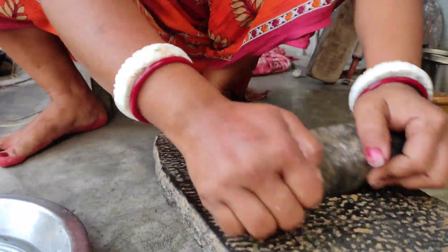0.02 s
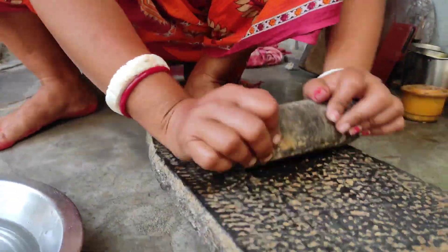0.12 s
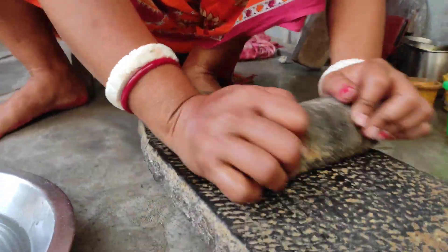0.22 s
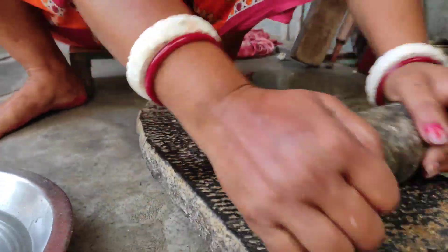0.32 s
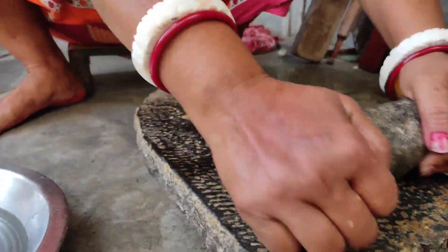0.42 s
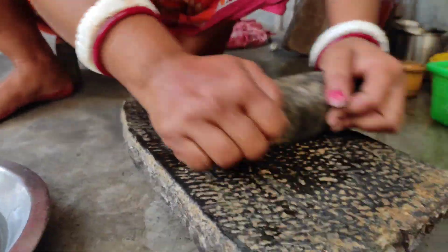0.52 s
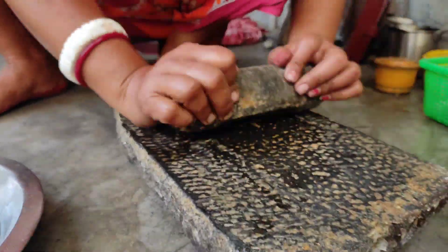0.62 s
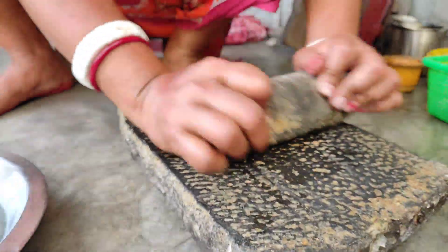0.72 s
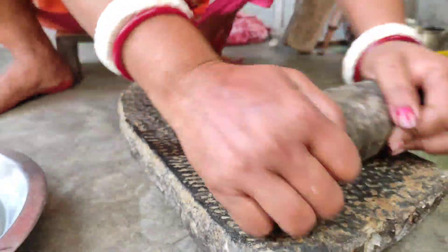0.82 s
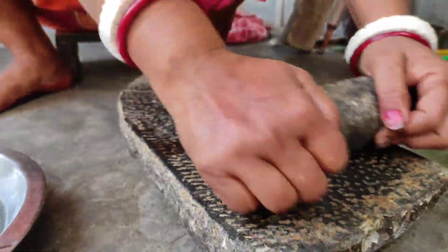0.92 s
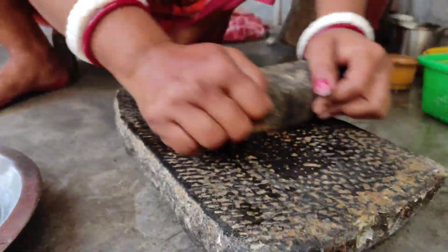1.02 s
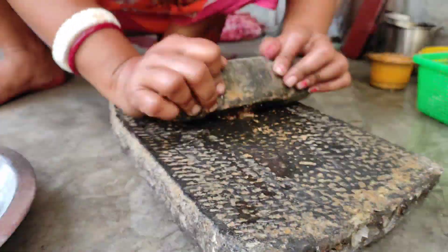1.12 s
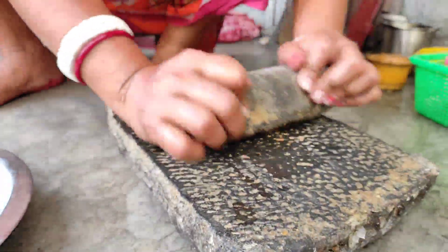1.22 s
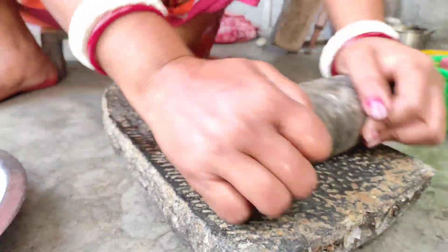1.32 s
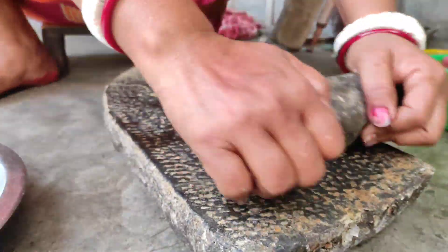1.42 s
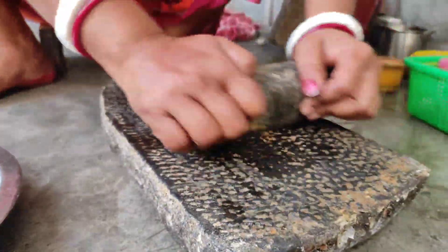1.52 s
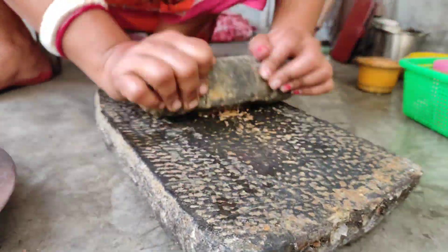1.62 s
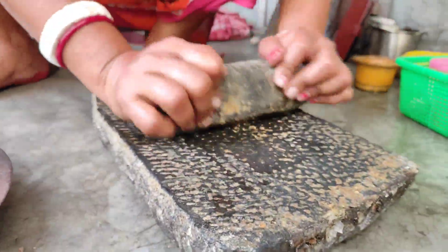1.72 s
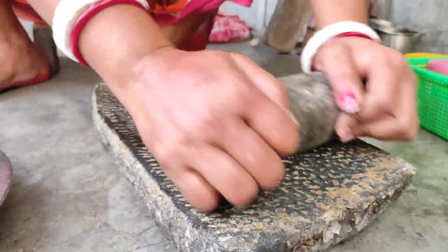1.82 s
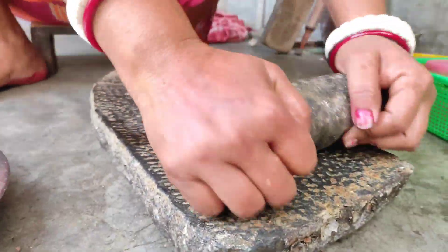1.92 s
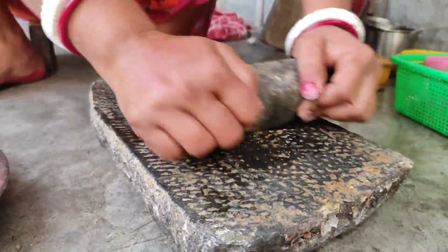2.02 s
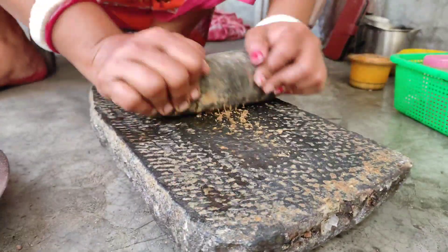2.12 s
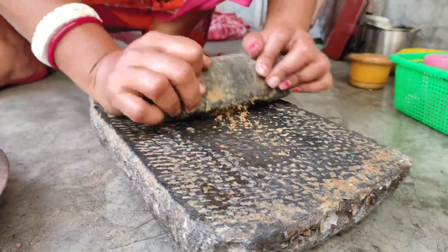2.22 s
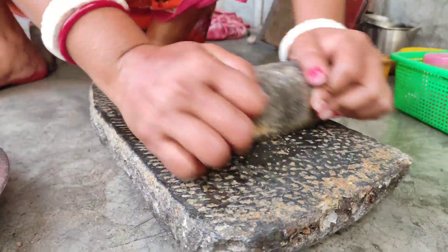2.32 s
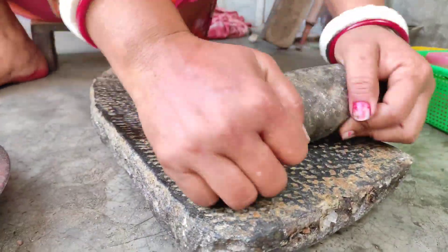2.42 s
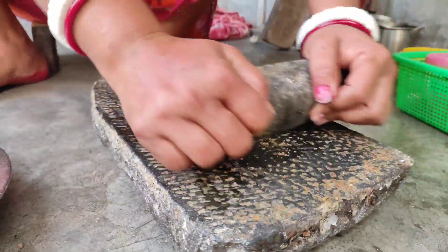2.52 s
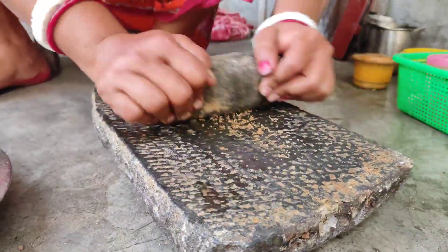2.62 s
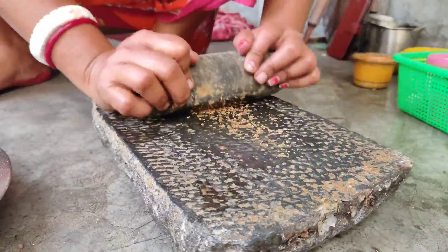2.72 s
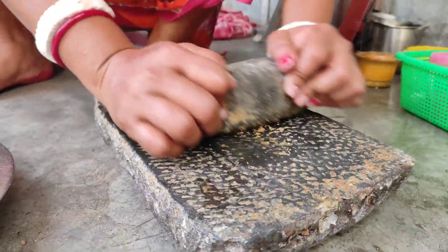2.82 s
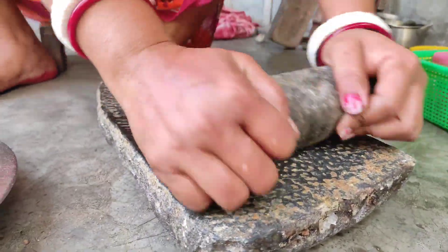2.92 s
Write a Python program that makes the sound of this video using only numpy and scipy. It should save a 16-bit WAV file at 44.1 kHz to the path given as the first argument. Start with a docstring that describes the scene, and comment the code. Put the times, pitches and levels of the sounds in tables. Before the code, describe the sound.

Stone roller knocking and scraping on a pitted stone slab, heard close in a small hard room. Soft quick knocks build from 0.05 to 0.27 s; loud, dry, hollow rattles follow around 0.4-0.5, 0.65-0.75, 0.95, 1.45, 1.7 and 2.0 s, then lighter ones at 2.2, 2.55 and 2.75. Gritty hisses swell near 0.9, 1.4, 1.9, 2.4 and 2.95 s, with seed cracks, a faint moan at 1.25 and low floor grumble.

```python
"""Soft knocks of stone on stone come first, over faint room noise, and soon grow into loud rattling bursts.
A stone roller pushed to and fro over a pitted slab on a hard floor: knocks and pit bumps drive the slab's
dull modes, and the harder contacts add dry cracks and a crunchy rasp. Flickering grains and noise make the
grit hiss of sliding, with seeds cracking, a narrow hum and a brief moan; low grumbles come through the floor."""
import sys
import numpy as np
from scipy import signal
from scipy.fft import rfft, irfft
from scipy.io import wavfile
from scipy.ndimage import uniform_filter1d

SR = 44100
rng = np.random.default_rng(int(sys.argv[2]) if len(sys.argv) > 2 else 0)


def unload_wav(signal):
    """Save mono or channel-first audio to the path in sys.argv[1] as 16-bit WAV at rate SR, clipped to [-1, 1]."""
    wavfile.write(
        sys.argv[1],
        SR,
        np.round(np.clip(np.atleast_2d(signal).T, -1, 1) * 32767).astype(np.int16),
    )


N = 132300

# Steady room noise, relative spectrum: pitch_hz [Hz], density_db [dB per Hz]
AIR_SPECTRUM = [(12, -24), (20, 13), (161, -1), (526, -19), (711, -46.5), (839, 14.5), (1200, -13),
                (1670, 9), (2590, -12.5), (4000, -12), (5800, -7.5), (8200, -25.5), (11700, -41),
                (14200, -40), (15600, -75)]
AIR_DB = -51
# Grumble through the floor: time_s [s], level_db [dB]
RUMBLE_LEVEL = [(0.0, -56), (0.04, -69), (0.3, -49.5), (0.34, -49), (0.4, -43.5), (0.53, -49), (0.59, -61),
                (0.66, -47), (0.85, -51.5), (0.96, -37), (1.1, -54.5), (1.19, -50.5), (1.29, -52),
                (1.33, -56), (1.46, -40.5), (1.53, -45), (1.56, -54), (1.65, -58.5), (1.7, -43.5),
                (1.85, -58), (1.98, -35.5), (2.15, -60), (2.21, -48), (2.33, -48.5), (2.37, -66),
                (2.41, -48), (2.51, -40.5), (2.58, -43), (2.65, -72), (2.7, -51), (2.73, -41), (2.91, -59),
                (2.97, -42), (3.0, -47.5)]
# Relative spectrum of the grumble: pitch_hz [Hz], density_db [dB per Hz]
RUMBLE_SPECTRUM = [(50, -35), (100, -3.5), (200, 1.5), (400, 3.5), (650, 2), (1200, -33)]
# Brief low moans while sliding: start_s [s], length_s [s], starting pitch_hz [Hz], level_db [dB]
MOAN_EVENTS = [(1.229, 0.098, 224, -46.5)]

# Hiss of the sliding roller, before flicker and patches: time_s [s], level_db [dB]
SLIDE_LEVEL = [(0.0, -66.5), (0.22, -54), (0.29, -71), (0.31, -35), (0.34, -54), (0.35, -38.5), (0.39, -51),
               (0.53, -54), (0.54, -34.5), (0.55, -58), (0.59, -65.5), (0.71, -54.5), (0.78, -63),
               (0.8, -40), (0.84, -46.5), (0.88, -33), (0.9, -42), (0.94, -44.5), (1.01, -68), (1.02, -51),
               (1.09, -73), (1.17, -57), (1.28, -57.5), (1.29, -45.5), (1.37, -38.5), (1.39, -27),
               (1.5, -50), (1.54, -60), (1.57, -65), (1.72, -55), (1.79, -37.5), (1.86, -48.5), (1.88, -33),
               (1.91, -29.5), (1.98, -37.5), (2.0, -62), (2.03, -40), (2.05, -58), (2.1, -76), (2.2, -59.5),
               (2.31, -37.5), (2.39, -47), (2.41, -30.5), (2.46, -32.5), (2.51, -37.5), (2.62, -69),
               (2.73, -58), (2.83, -32.5), (2.92, -50.5), (2.95, -31), (2.97, -31), (3.0, -36.5)]
# Relative spectrum of the hiss: pitch_hz [Hz], density_db [dB per Hz]
HISS_SPECTRUM = [(1060, -63), (1800, -12), (2140, -15), (2920, -6.5), (3880, -1), (4620, -3.5), (7170, -5),
                 (9540, -5.5), (13000, -0.5), (14200, -4.5), (14450, -41), (15600, -59)]
# Broad resonances of the grit: pitch_hz [Hz], width_hz [Hz], relative level_db [dB]
GRIT_RESONANCES = [(7070, 630, -1), (5650, 2600, -4.5)]
# Seeds cracking, as sudden lifts of the hiss: start_s [s], relative level_db [dB]
SEED_CRACKS = [(0.537, -27.5), (1.0183, -31.5), (1.284, -32), (1.5184, -22), (1.88, -30.5), (2.0254, -25.5),
               (2.412, -14.5), (2.4241, -28), (2.4655, -25), (2.4913, -12)]
SEED_DECAY_S = 0.002
GRAINS_PER_S, GRAIN_SPREAD_DB = 4900, 5.5
SMOOTH_SHARE, FLICKER_DB = 0.79, 1.48  # share of fine noise against grains; rms flicker of the hiss
PATCH_DB, PATCH_HZ, PATCH_S = 3, 900, .012  # uneven grit: the hiss brightens and dulls in patches
HUM_HZ, HUM_WIDTH_HZ = 1501, 52
HUM_DB, HUM_FOLLOW = -50.5, 0.43  # level when the hiss is at -45 dB; dB of hum per dB of hiss

# Likeness of left and right: pitch_hz [Hz], likeness [0 to 1]
STEREO_LIKENESS = [(25, .5), (60, .9), (150, .97), (400, .75), (1500, .7), (4000, .5), (12000, .5)]
# Phase by which left leads right: pitch_hz [Hz], lead_rad [radians]
STEREO_LEAD = [(0, 0), (400, 0), (1500, 1.5), (3450, 8.9), (5510, 10.4), (7840, 28.6), (12800, 45.8)]
# Balance: pitch_hz [Hz], left minus right level_db [dB]
STEREO_TILT = [(100, -0.5), (500, -1), (1500, -1), (4200, -1.5), (5800, -5), (7300, -5), (9000, 1.5),
               (14000, -2.5)]
ROOM_DB, ROOM_T60_S = -8.5, 0.18

# Dry stone crack, relative spectrum: pitch_hz [Hz], density_db [dB per Hz]
CRACK_SPECTRUM = [(200, -16.5), (500, 0.5), (1200, 5), (2800, 2), (4000, -8.5), (6000, -26), (9000, -78),
                  (15000, -76)]
CRACK_DECAY_S = 0.0024
# Rasp of grit shaken by the rattle, relative spectrum: pitch_hz [Hz], density_db [dB per Hz]
RASP_SPECTRUM = [(1200, -26), (2200, 1.5), (3050, -9), (3450, 1.5), (3900, -4), (4600, -2), (5800, 1.5),
                 (7500, -23), (10000, -48)]
RASP_DB, RASP_FOLLOW = -41.5, 0.55  # level at the loudest rattle; power of the rattle it follows

# Roller bumping over the pits: time_s [s], relative level_db [dB],
# second_db and clatter_db [dB]: those mode groups against the level
ROLL_LEVEL = [(0.0, -54, -6, -14), (0.15, -36, -7, -15), (0.28, -33.5, -16, -13), (0.34, -74, -19, -24),
              (0.48, -32.5, 1, 3.5), (0.6, -47, -16, -37), (0.73, -49.5, 11, -15), (1.11, -45.5, -2, -20),
              (1.24, -55, 10.5, -10), (2.0, -53, -33, 2), (2.1, -47, -15, -4), (2.25, -68, 2, -16),
              (2.49, -42.5, -10, -10), (2.66, -52.5, -20.5, -16), (2.79, -47, -4, -2), (3.0, -90, 6, -32.5)]
BUMPS_PER_S, BUMP_SPREAD_DB, BUMP_S = 1500, 2, .0001
# Knocks of roller on slab: start_s [s], relative level_db [dB],
# second_db, clatter_db, crack_db [dB]: those parts against the level,
# pitch_hz [Hz] favoured by the contact spot, contact_s [s] (held between 0.0002 and 0.005)
KNOCK_EVENTS = [(0.056, -25.5, -14.5, -37, -44, 817, 0.0017), (0.083, -27, -18, -38, -42, 820, 0.0015),
                (0.095, -19.5, -10.5, -35, -30, 818, 0.0043), (0.143, -17, -27, -30, -34, 758, 0.0012),
                (0.164, -20, -22, -22, -30, 890, 0.0019), (0.184, -18, -25, -30, -27, 833, 0.0013),
                (0.201, -19, -19, -20, -32, 852, 0.0018), (0.214, -18.5, -14, -19, -30, 780, 0.0016),
                (0.225, -15, -4, -18.5, -34, 930, 0.0014), (0.239, -16, -29, -32, -48, 860, 0.00068),
                (0.253, -14.5, -4.5, -20, -44, 820, 0.0013), (0.269, -14, 4, -12, -19, 815, 0.0014),
                (0.366, -24.5, 0.5, -13, -21, 830, 0.00048), (0.399, -2, -14.5, -21, -16.5, 958, 0.00083),
                (0.413, -4.5, -21, -17, -18, 919, 0.0011), (0.426, -12.5, -31, -13, -20, 866, 0.00089),
                (0.459, -11, -16, -21, -25, 964, 0.00066), (0.487, -7.5, -30, -25, -45, 872, 0.0014),
                (0.509, -8, -23, -32, -53, 905, 0.0019), (0.523, -16, -18.5, -15.5, -47, 820, 0.0023),
                (0.637, -15.5, -15, -26, -42, 757, 0.0057), (0.661, -9.5, -22, -23, -44, 864, 0.0023),
                (0.685, -12, -39, -27.5, -53, 865, 0.0017), (0.707, -14.5, -22, -19, -38, 810, 0.0015),
                (0.717, -7, -28, -27, -36, 822, 0.0037), (0.731, -12, -17, -13.5, -33, 822, 0.00055),
                (0.765, -11.5, -9.5, -22, -44, 873, 0.0022), (0.944, -6, -6.5, -9, -9.5, 874, 0.0022),
                (0.954, -6, -5.5, 0, -16.5, 791, 0.00083), (0.98, -7.5, -16, -21, -21, 884, 0.00072),
                (0.998, -9, -30, -15, -32, 904, 0.0016), (1.019, -19.5, -21, -12, -35, 861, 0.0034),
                (1.141, -17, -19, -18, -50, 802, 0.0054), (1.17, -13, -30, -25.5, -45, 870, 0.0026),
                (1.201, -13.5, -23.5, -20.5, -39, 852, 0.0021), (1.452, -7, -19, -24, -15, 937, 0.0008),
                (1.465, -6.5, -22, -18.5, -24.5, 933, 0.002), (1.488, -7.5, -23.5, -28, -40, 890, 0.002),
                (1.508, -8.5, -23.5, -54, -40, 904, 0.0015), (1.519, -14.5, -15, -29, -45, 896, 0.0035),
                (1.552, -31, -28, -39, -42, 830, 0.0003), (1.668, -22, -32, -21, -33, 816, 0.0013),
                (1.694, -8.5, -22.5, -25.5, -30, 803, 0.0018), (1.713, -13, -15.5, -15, -24, 793, 0.0022),
                (1.97, -7, -16, -13.5, -11, 916, 0.00095), (1.988, -13.5, -13, -12, -11.5, 842, 0.00078),
                (2.004, -7, -39, -15, -25, 948, 0.0024), (2.02, -10, -21, -19.5, -26, 846, 0.00072),
                (2.048, -16, -17.5, -27, -34, 884, 0.0014), (2.16, -19.5, -23, -34, -38, 787, 0.0094),
                (2.196, -11.5, -25, -26, -42, 781, 0.0011), (2.212, -19, -21, -19.5, -47, 822, 0.00064),
                (2.222, -13.5, -20, -28, -29, 776, 0.0017), (2.236, -19, -38, -16.5, -28, 890, 0.0024),
                (2.55, -9.5, -23, -28, -33, 870, 0.003), (2.57, -17, -17.5, -34, -45, 830, 0.00096),
                (2.717, -19, -16, -14.5, -28, 872, 0.0019), (2.737, -17, -17, -14.5, -33, 828, 0.0019),
                (2.757, -21.5, -12, -14, -26, 826, 0.0014)]
# Slab modes: pitch_hz [Hz], relative level_db [dB], t60_s [s], left minus right pan_db [dB],
# left lead_rad [radians], group [a first, b second, c clatter, d high]
SLAB_MODES = [(318, -21, 0.079, 3, -0.5, "a"), (444.6, -14, 0.15, 3, -5.5, "a"),
              (531, -5, 0.078, -12.5, -2, "a"), (603.2, -9.5, 0.087, 7.5, 1, "a"),
              (753.4, -9.5, 0.055, 6, -0.6, "a"), (826.5, -5.5, 0.09, 2.5, 0.67, "a"),
              (875.9, -2, 0.051, -3, 0.2, "a"), (986, -6, 0.042, -7.5, 1.36, "a"),
              (1062.7, -9.5, 0.088, 5, 0.85, "a"), (1443, 2, 0.044, 5.5, 4.5, "b"),
              (1486, -5, 0.024, -24, -1, "b"), (1785, -3.5, 0.077, 0, -3, "c"),
              (1962, -6, 0.024, -12.5, -4.5, "c"), (2105, -2.5, 0.027, -7, 1.5, "c"),
              (2189, -7, 0.04, 1.5, 1.5, "c"), (1362, -5.5, 0.036, 13.5, 3, "b"),
              (3428, -13.5, 0.03, 2.5, 4, "d")]
# Rough noise in each knock's push, as a share by mode group
KNOCK_GRIT = {"a": 0.86, "b": 0.13, "c": 0.59, "d": 3.3}
PICK_DB_PER_HZ, SPOT_DB = 0.17, 1.2  # loss away from the favoured pitch; chance spread of each mode's level
# rms share of pitch, and pace in seconds, of the random drift in the pitch of each mode and of the hum
WANDER, WANDER_S = 0.007016, 0.03016

FULL_SCALE, EDGE_HZ = .95, 15600  # soft ceiling; top of the band


def amp(db):
    """Turns decibels into amplitude."""
    return 10 ** (np.asarray(db) / 20)


def evened(x):
    """Scales a signal to an rms of 1."""
    return x / np.sqrt(np.mean(abs(x) ** 2) + 1e-20)


def read(points, hz):
    """Reads a spectrum table between its points on a log pitch scale."""
    f, value = np.transpose(points)
    return np.interp(np.log(hz + 1), np.log(f + 1), value)


def curve(table, column):
    """Draws one column of a timed table as a line over the whole scene."""
    rows = np.array(table)
    return np.interp(np.arange(N) / SR, rows[:, 0], rows[:, column])


def sparse(per_s, spread_db):
    """Clicks at random moments, a few of them large."""
    size = amp(spread_db * np.minimum(rng.exponential(1, N), 5))
    size = size * rng.choice([-1., 1.], N)
    return evened(size * (rng.random(N) < per_s / SR))


def ring(x, hz, width_hz):
    """One decaying resonance, as a complex signal."""
    r = np.exp(-np.pi * width_hz / SR)
    pole = r * np.exp(2j * np.pi * hz / SR)
    return 2 * signal.lfilter([1], [1, -pole], x + 0j)


def drift(span_s):
    """Slow random motion of rms 1."""
    size = max(3, round(span_s * SR))
    once = uniform_filter1d(rng.standard_normal(N), size)
    return evened(uniform_filter1d(once, size))


def waver(z, hz):
    """Lets the pitch of a complex ringing drift a little at random."""
    shift_hz = WANDER * hz * drift(WANDER_S)
    return z * np.exp(2j * np.pi * np.cumsum(shift_hz) / SR)


def patchy(x):
    """Random patches of level over time and pitch."""
    z = signal.stft(x, nperseg=256, noverlap=192)[2]
    field = rng.standard_normal(z.shape[:0:-1])
    field = uniform_filter1d(field, max(1, round(PATCH_S * SR / 64)), axis=0)
    field = evened(uniform_filter1d(field, max(1, round(PATCH_HZ * 256 / SR)), axis=1))
    patched = signal.istft(z * amp(PATCH_DB * field.T), nperseg=256, noverlap=192)[1]
    return evened(patched[:, :N])


def stereo(pair, spectrum):
    """Colours two independent signals and mixes them into left and right with likeness, lead and tilt."""
    hz = np.fft.rfftfreq(N, 1 / SR)
    shared, other = rfft(pair) * amp(read(spectrum, hz))
    same = read(STEREO_LIKENESS, hz)
    right = same * shared + np.sqrt(1 - same ** 2) * other
    right = right * np.exp(-1j * read(STEREO_LEAD, hz))
    tilt = amp(read(STEREO_TILT, hz) / 2)
    return evened(irfft(np.array([shared * tilt, right / tilt]), N))


def air():
    """Faint room noise: steady coloured noise."""
    return amp(AIR_DB) * stereo(rng.standard_normal((2, N)), AIR_SPECTRUM)


def room(x):
    """Short tail of hard walls and floor: decaying noise that smears the near sound."""
    t = np.arange(SR // 4) / SR
    tail = rng.standard_normal((2, len(t))) * amp(-60 * t / ROOM_T60_S) * (t > .003)
    tail = tail / np.linalg.norm(tail[0])
    return amp(ROOM_DB) * signal.fftconvolve(x, tail, axes=1)[:, :N]


def rumble():
    """The floor carries a low grumble of the strokes, built from dense filtered clicks."""
    low = np.array([sparse(600, 2.5) for _ in "LR"])
    return stereo(low, RUMBLE_SPECTRUM) * amp(curve(RUMBLE_LEVEL, column=1))


def moans():
    """Short fuzzy low tones that rise in pitch, swell and fade, alike on both sides."""
    out, t = np.zeros(N), np.arange(N) / SR
    for start_s, length_s, hz, db in MOAN_EVENTS:
        since = t - start_s
        swell = np.sin(np.pi * np.clip(since / length_s, 0, 1))
        tone = np.sin(2 * np.pi * hz * since * (1 + 0.83 * since))
        fuzz = evened(ring(rng.standard_normal(N), hz, 40).real)
        out += amp(db) * swell * (tone + 0.58 * fuzz)
    return out


def hum():
    """Narrow wavering resonance excited by clicks; its level follows the hiss."""
    tone = ring(sparse(900, 3.0), HUM_HZ, HUM_WIDTH_HZ)
    tone = evened(ring(tone, HUM_HZ, 3 * HUM_WIDTH_HZ))
    level_db = HUM_DB + HUM_FOLLOW * (curve(SLIDE_LEVEL, column=1) + 45)
    tone = waver(tone * amp(level_db), HUM_HZ)
    return np.array([(tone * np.exp(1.1j)).real * amp(3.5), tone.real * amp(-3.5)])


def slide():
    """Grit under the sliding roller: grains and fine hiss that flicker, with seeds cracking."""
    flicker = evened(uniform_filter1d(rng.standard_normal(N), 250))
    fine = SMOOTH_SHARE * rng.standard_normal((2, N))
    grains = np.array([sparse(GRAINS_PER_S, GRAIN_SPREAD_DB) for _ in "LR"])
    grit = fine + (1 - SMOOTH_SHARE) * grains
    grit = grit + sum(amp(db) * evened(ring(grit, hz, width).real) * .5
                      for hz, width, db in GRIT_RESONANCES)
    level = amp(curve(SLIDE_LEVEL, column=1) + FLICKER_DB * flicker)
    t = np.arange(N) / SR
    for start_s, db in SEED_CRACKS:
        fade = np.exp(-np.maximum(t - start_s, 0) / SEED_DECAY_S)
        level = level + amp(db - 8) * (t > start_s) * fade
    return patchy(stereo(grit, HISS_SPECTRUM)) * level + hum()


def contact():
    """The dry crack of stone on stone at each knock: a decaying noise burst, coloured."""
    burst, t = np.zeros((2, N)), np.arange(900) / SR
    grit = rng.standard_normal((len(KNOCK_EVENTS), 2, 900))
    for (start_s, level_db, _, _, crack_db, *_), noise in zip(KNOCK_EVENTS, grit):
        crack = amp(level_db + crack_db + 4.0) * np.exp(-t / CRACK_DECAY_S) * noise
        burst[:, round((start_s + .001) * SR):][:, :900] += crack
    # The spectrum is doubled in dB because the minimum-phase step halves it
    hz = np.linspace(0, SR / 2, 512)
    doubled = amp(2 * read(CRACK_SPECTRUM, hz))
    colour = signal.minimum_phase(signal.firwin2(1023, np.linspace(0, 1, 512), doubled))
    colour = colour / np.linalg.norm(colour)
    burst = np.array([burst[0], 0.41 * burst[0] + 0.53 * burst[1]])
    return signal.oaconvolve(burst, colour[None], axes=1)[:, :N]


def rasp(rattle):
    """Dense crunchy grain that swells with the rattle of the slab."""
    force = np.sqrt(abs(uniform_filter1d((rattle ** 2).mean(0), size=300)))
    grain = np.array([sparse(2500, 2.4) for _ in "LR"])
    swell = (force / force.max()) ** RASP_FOLLOW
    return amp(RASP_DB) * stereo(grain, RASP_SPECTRUM) * swell


def slab():
    """Knocks and bumps drive the modes; each mode reaches left and right with its own balance and phase."""
    bump = np.hanning(max(3, round(BUMP_S * SR)))
    bumps = evened(signal.oaconvolve(sparse(BUMPS_PER_S, BUMP_SPREAD_DB), bump)[:N])
    bumps = bumps * amp(curve(ROLL_LEVEL, column=1) - 34.5)
    roll_db = {"a": 0, "b": curve(ROLL_LEVEL, column=2), "c": curve(ROLL_LEVEL, column=3), "d": 0}
    grit = uniform_filter1d(rng.standard_normal((len(KNOCK_EVENTS), 900)), size=9) * 3
    spot = rng.standard_normal((len(KNOCK_EVENTS), len(SLAB_MODES), 2))
    t, out = np.arange(900) / SR, np.zeros((2, N))
    for m, (hz, db, t60_s, pan_db, lead_rad, group) in enumerate(SLAB_MODES):
        # The bumps are narrowed to the region of this mode
        drive = ring(bumps, hz, hz / 2).real * (1 - np.exp(-np.pi * hz / 2 / SR))
        drive = drive * amp(roll_db[group])
        for k, knock in enumerate(KNOCK_EVENTS):
            start_s, level_db, second_db, clatter_db, _, pick_hz, contact_s = knock
            shape = t * np.exp(-t / np.clip(contact_s, 2e-4, .005))
            tone = np.sin(2 * np.pi * hz * t + .5 * spot[k, m, 0])
            push = shape / shape.sum() * (tone + KNOCK_GRIT[group] * grit[k])
            pick_db = -PICK_DB_PER_HZ * min(abs(hz - pick_hz), 120)
            share_db = {"a": pick_db, "b": second_db, "c": clatter_db, "d": clatter_db / 2}[group]
            push_db = level_db + share_db + SPOT_DB * spot[k, m, 1] + 1.0
            drive[round(start_s * SR):][:900] += amp(push_db) * push
        width_hz = np.log(1000) / np.pi / t60_s
        z = amp(db) * waver(ring(drive, hz, width_hz), hz)
        left = (z * np.exp(1j * lead_rad)).real * amp(pan_db / 2)
        out += [left, z.real * amp(-pan_db / 2)]
    return out


def scene():
    """Sums the near sounds, adds their room tail and lays the room noise under them."""
    rattle = slab()
    near = rattle + rasp(rattle) + contact() + slide() + rumble() + moans()
    return near + room(near) + air()


def record(dry):
    """The loudest peaks saturate softly; then the band limit."""
    soft = dry / (1 + (abs(dry) / FULL_SCALE) ** 4) ** .25
    low_pass = signal.firwin(1023, EDGE_HZ, window=("kaiser", 9), fs=SR)
    return .97 * signal.oaconvolve(soft, low_pass[None], "same")


dry = scene()
out = record(dry)
unload_wav(out)
```